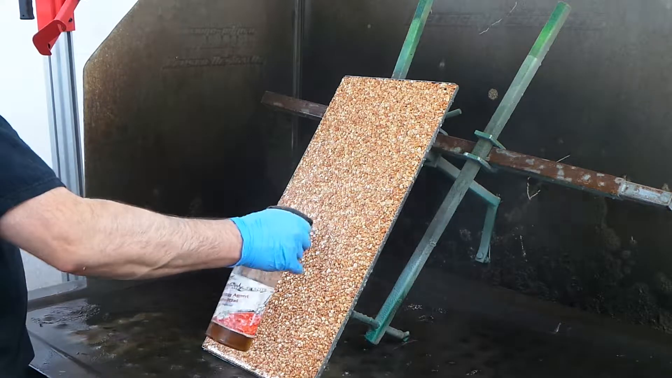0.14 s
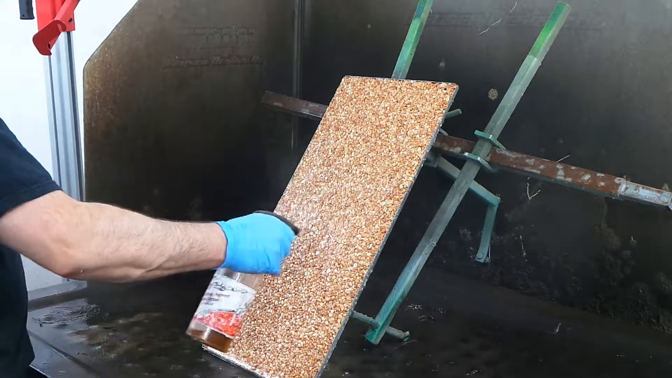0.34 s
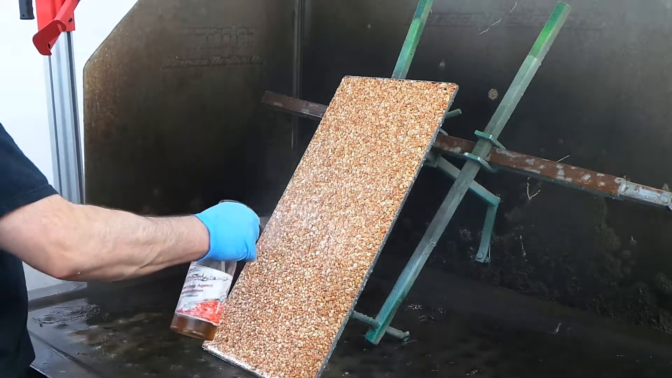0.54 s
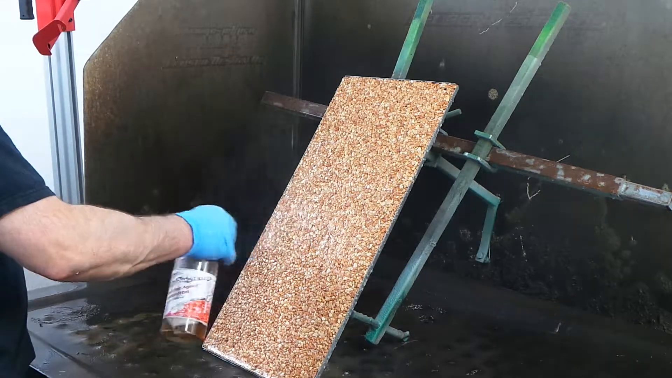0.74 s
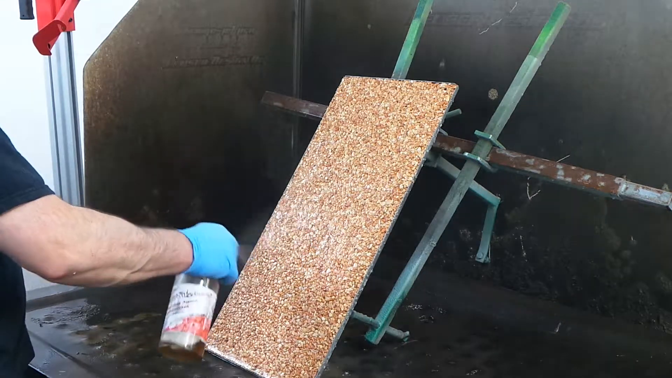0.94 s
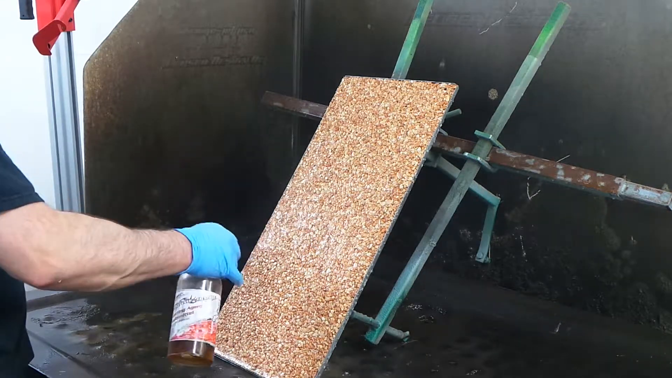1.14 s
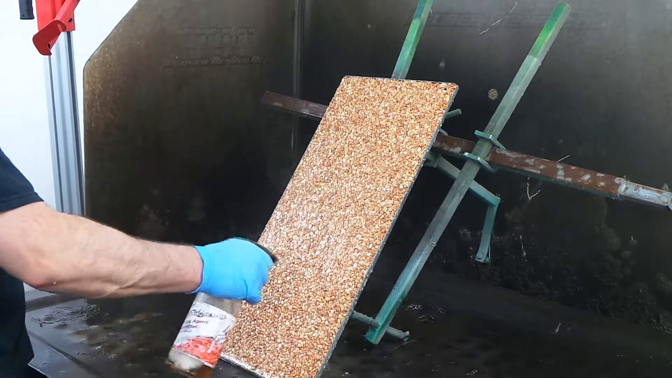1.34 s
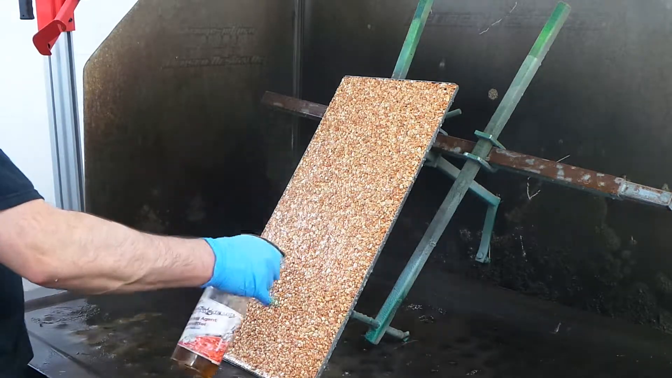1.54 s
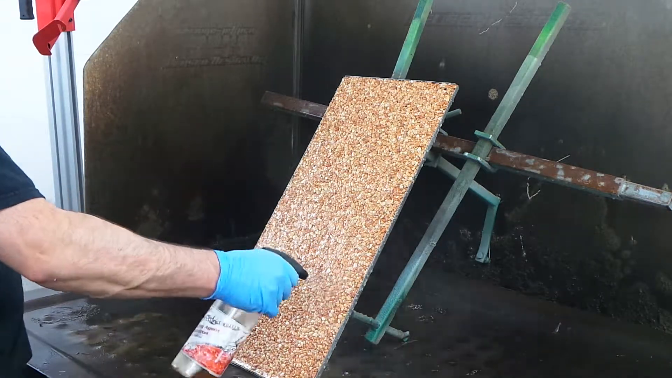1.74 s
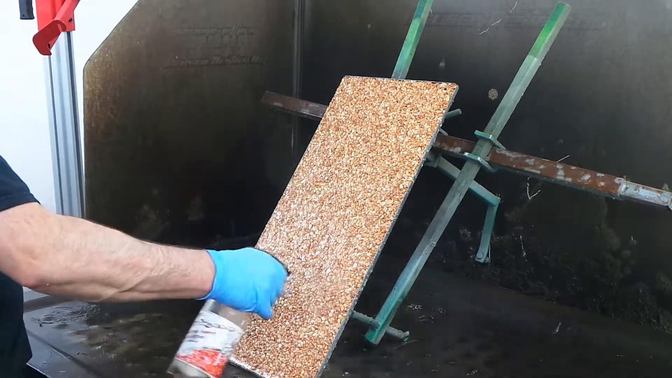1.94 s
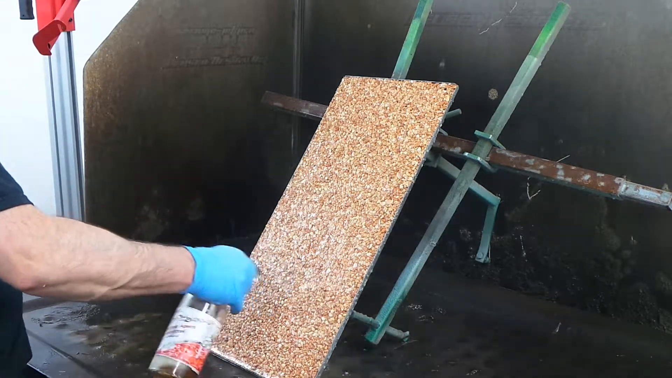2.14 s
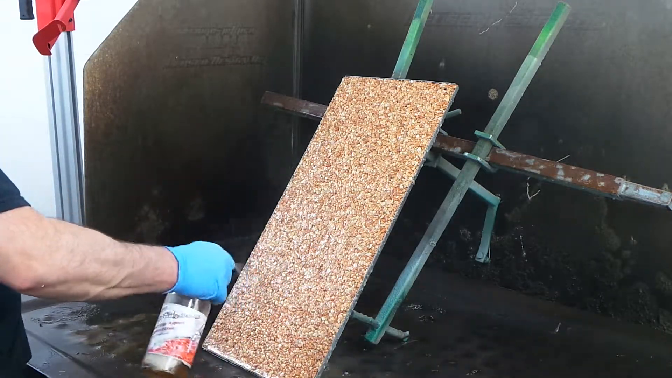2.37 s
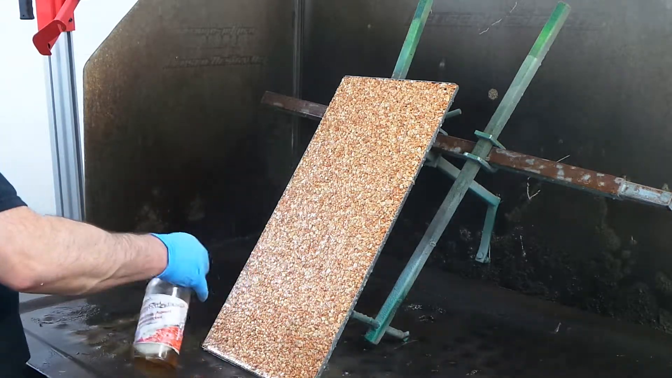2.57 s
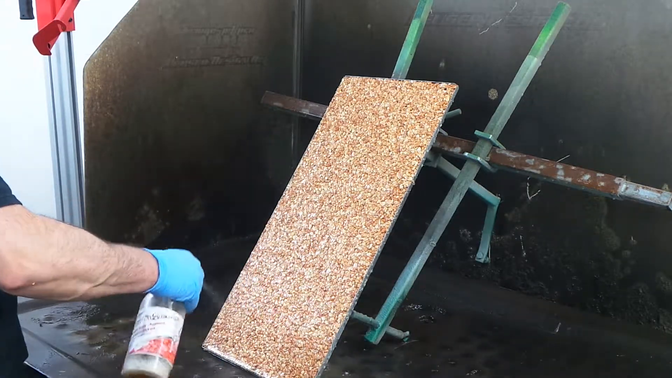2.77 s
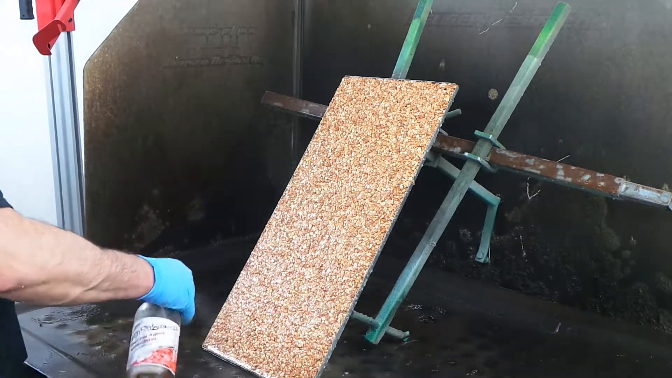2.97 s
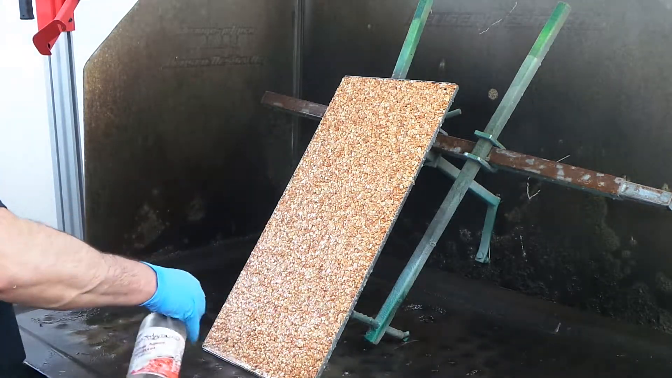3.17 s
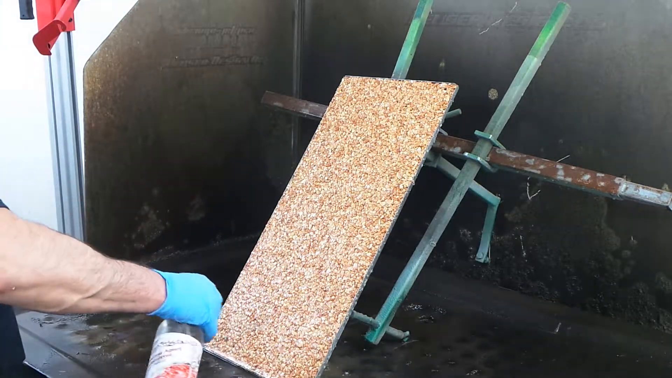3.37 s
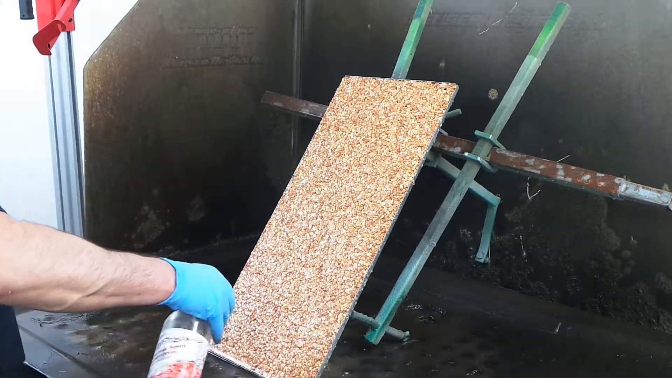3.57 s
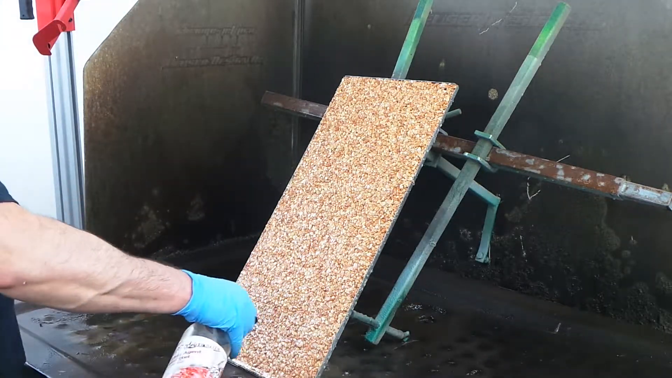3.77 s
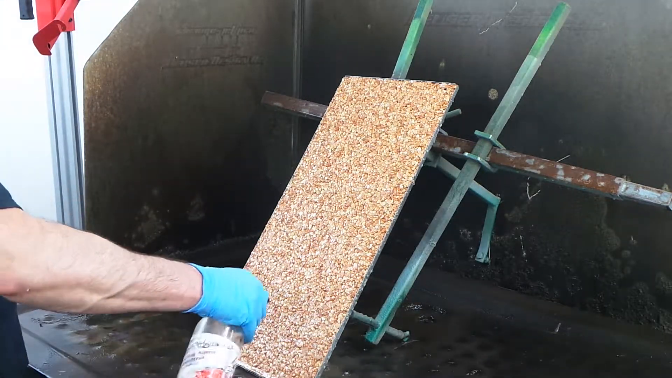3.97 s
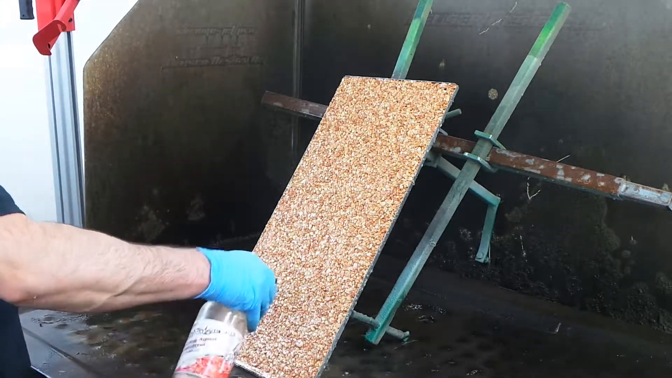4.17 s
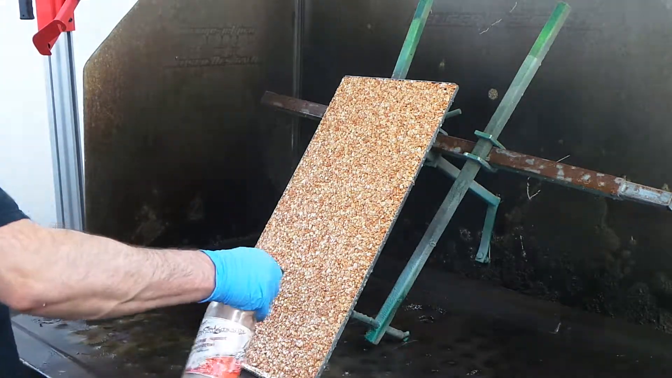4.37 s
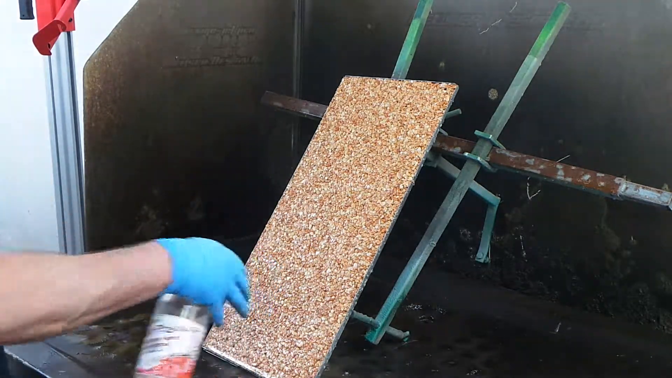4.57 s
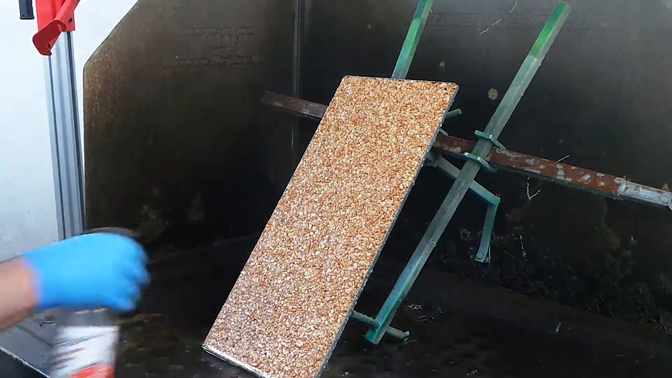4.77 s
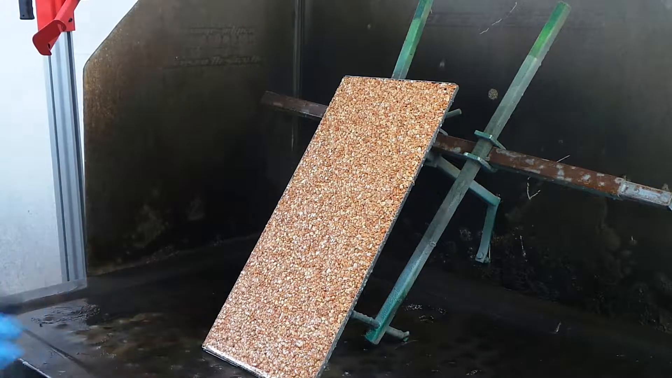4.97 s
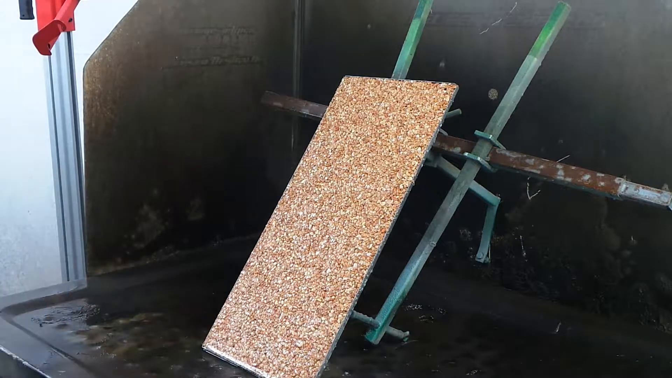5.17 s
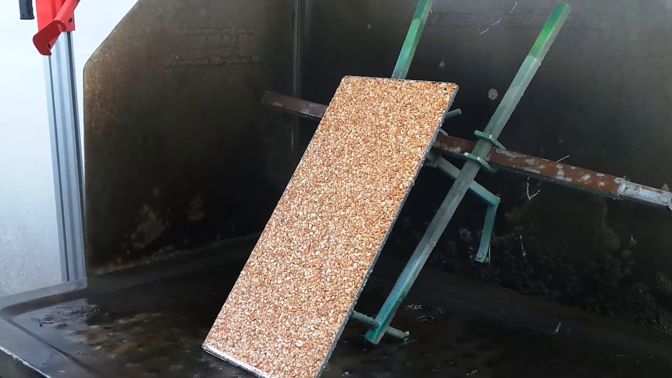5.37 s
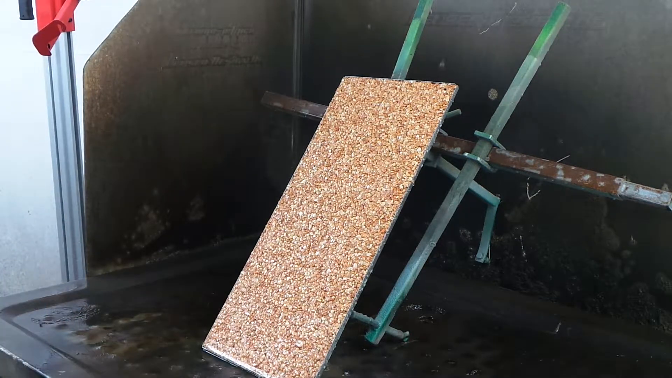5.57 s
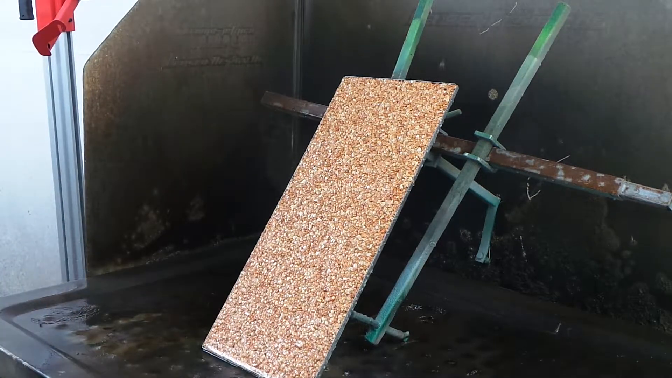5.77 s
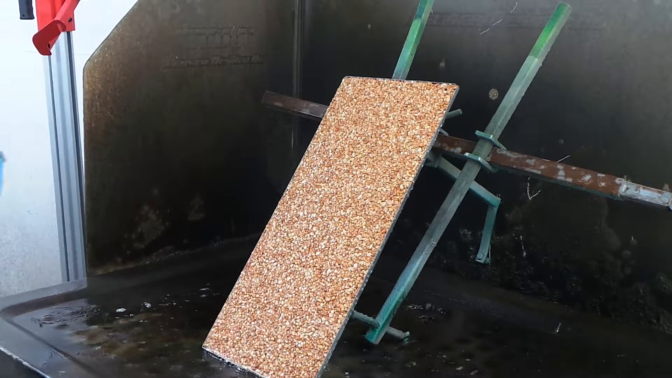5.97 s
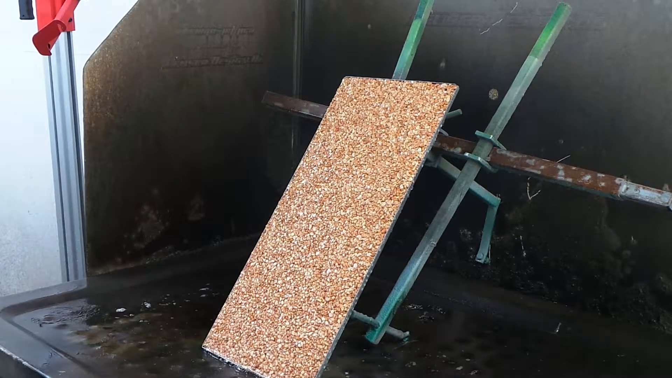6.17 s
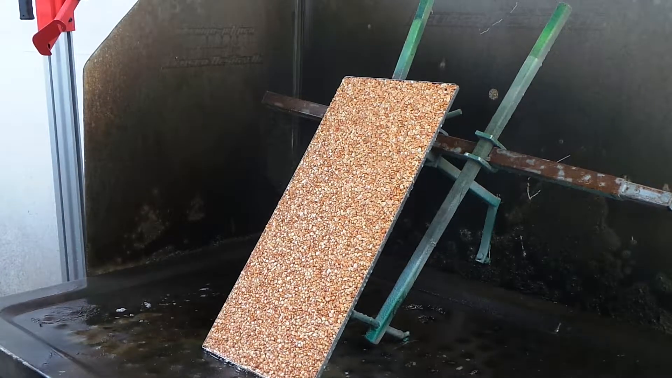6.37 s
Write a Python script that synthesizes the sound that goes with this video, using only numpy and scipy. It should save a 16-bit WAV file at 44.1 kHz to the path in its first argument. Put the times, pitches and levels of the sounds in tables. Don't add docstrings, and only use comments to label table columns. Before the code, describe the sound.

In a metal spray booth, a hand trigger bottle squirts about three times a second, each pull a small plastic snap and short bright hiss pattering on a leaning panel. Midway a soft low thud comes from far off. The squirts stop after a slightly stronger last one, leaving faint air hiss and hum, then a brief final puff. One nearby microphone, slightly coarse, nearly mono sound.

```python
import sys
import numpy as np
from scipy import signal
from scipy.fft import rfft, irfft
from scipy.io import wavfile
from scipy.ndimage import uniform_filter1d

SR = 44100
rng = np.random.default_rng(int(sys.argv[2]) if len(sys.argv) > 2 else 0)


def generate_wav(sig):
    pcm = np.round(np.clip(np.atleast_2d(sig).T, -1, 1) * 32767).astype(np.int16)
    wavfile.write(sys.argv[1], SR, pcm)


def to_linear_factor(level_db):
    exponent = np.asarray(level_db, float) / 20
    return 10 ** exponent


N = 283122

# hz, level_db (per Hz)
PATTER_SPECTRUM = [(900, -11.5), (1500, -2.5), (2300, 0.5), (3500, -2), (5000, -2.5), (7000, -19.5)]


def rms_one(x):
    return x / np.sqrt(np.mean(x ** 2) + 1e-20)


def in_time(rows):
    s, *columns = np.transpose(rows)
    return [np.interp(np.arange(N) / SR, s, c) for c in columns]


def drift(rate_hz):
    r = np.exp(-40 * np.pi * rate_hz / SR)
    white = rng.standard_normal(N // 20 + 4002)
    slow = signal.lfilter([1], [1, -2 * r, r * r], white)[4000:]
    return np.interp(np.arange(N) / 20, np.arange(len(slow)), rms_one(slow))


def coloured(x, spectrum, peaks=()):
    hz = np.arange(N // 2 + 1) * SR / N + 1
    curve_hz, curve_db = np.transpose(spectrum)
    db = np.interp(np.log(hz), np.log(curve_hz), curve_db)
    for peak_hz, width_hz, top_db in peaks:
        db = db + top_db / (1 + (2 * (hz - peak_hz) / width_hz) ** 2)
    return rms_one(irfft(rfft(x) * to_linear_factor(db), N))


def droplets(per_s, spread_db, share, flutter_db):
    sizes = to_linear_factor(spread_db * np.minimum(rng.exponential(1, N), 5)) * rng.choice([-1, 1], N)
    hits = rms_one(sizes * (rng.random(N) < per_s / SR))
    share = np.clip(share, 0, 1)
    mix = np.sqrt(share) * hits + np.sqrt(1 - share) * rng.standard_normal(N)
    return mix * to_linear_factor(flutter_db * drift(38) + flutter_db * drift(3))


def swell(start_s, top_db, rise_s, t60_s):
    t = np.arange(N) / SR - start_s
    return np.clip(t / rise_s, 0, 1) * to_linear_factor(top_db - 60 * np.maximum(t - rise_s, 0) / t60_s)


def booth_echoes(x):
    t60_s = .12
    t = np.arange(SR // 16) / SR
    echoes = to_linear_factor(-33 - 60 * t / t60_s) * rng.standard_normal(len(t))
    echoes[0] = 1
    return rms_one(signal.fftconvolve(x, echoes)[:N])


def workshop():
    # hz, level_db (per Hz)
    air_spectrum = [(18, -56), (30, -25.5), (69, -13), (98, -4), (124, -11), (397, -14.5), (463, -19.5),
                    (776, -12), (1270, -15), (1440, -14), (2970, -14), (3650, -16), (5970, -14.5),
                    (12000, -7.5), (14400, -7.5)]
    # time_s, level_db
    air_level = [(0, -44.5), (.2, -44), (3.5, -45), (4.6, -44), (5.45, -46), (6.42, -44.5)]
    # peak_hz, width_hz, top_db
    booth_modes = [(428, 26, 11), (887, 50, 4.5), (1373, 28, 9.5), (1461, 9.1, 17.5), (1760, 36, 9.5),
                   (1895, 21, 13), (1950, 170, 2.5), (2077, 26, 12.5), (2290, 77, 6), (2720, 46, 4.5),
                   (3780, 120, 7), (7140, 200, 6), (7650, 250, 6), (12800, 250, -0.5)]
    # time_s, level_db
    hum_level = [(0, -63.5), (3, -65), (4.2, -64), (5.2, -69), (6.42, -68)]
    hum_hz = 100.8
    air = coloured(booth_echoes(rng.standard_normal(N)), air_spectrum, booth_modes)
    air_db = in_time(air_level)[0] + 0.57 * drift(6.8)
    hum = np.sqrt(2) * np.sin(2 * np.pi * hum_hz * np.arange(N) / SR + .6 * drift(4))
    hum_db = in_time(hum_level)[0] + 1.9 * drift(5.5)
    return to_linear_factor(air_db) * air + to_linear_factor(hum_db) * hum


def pressure():
    # open_s, build_s, hold_s, crest_db, below_db (under the crest at opening)
    pulls = [(-.15, 0.091, 0.065, -37.5, 6), (0.197, 0.079, 0.093, -39, 2), (.548, 0.11, 0.051, -38.5, 4.5),
             (0.89, 0.11, 0.068, -39, 9.5), (1.235, 0.11, 0.071, -37.5, 11), (1.605, 0.087, 0.083, -38, 8),
             (1.973, .11, 0.075, -37.5, 11), (2.337, 0.1, 0.066, -38.5, 10.5),
             (2.685, 0.072, 0.1, -40, 3.5), (3.014, 0.13, 0.045, -38, 8.5), (3.331, .14, .03, -37, 13.5),
             (3.698, .06, 0.082, -40.5, 2.5), (4.018, .07, 0.096, -38.5, 8),
             (4.328, 0.088, 0.0097, -34.5, 13.5)]
    open_s, hold_sag_db_per_s, release_db_per_s = .012, 15, 134
    take_up_s, dribble_db = 0.049, -8
    linger_db, linger_t60_s = -22.5, .7
    soak_db_per_s = 1.8

    s, build_s, hold_s, crest_db, below_db = np.transpose(pulls)[:, :, None]
    clock = np.arange(0, N, 16)
    t = clock / SR - s
    short_db = below_db * np.clip(1 - t / build_s, 0, 1) ** 1.1 * (t > -take_up_s)
    after_s = np.maximum(t - build_s, 0)
    fall_db = hold_sag_db_per_s * after_s + release_db_per_s * np.maximum(after_s - hold_s, 0)
    dribble = to_linear_factor(dribble_db) * np.clip(1 + t / take_up_s, 0, 1)
    valve = np.maximum(np.clip(t / open_s, 0, 1), dribble)
    power = np.sum((valve * to_linear_factor(crest_db - short_db - fall_db)) ** 2, axis=0) + 1e-12
    keep = to_linear_factor(-120 * clock[1] / (linger_t60_s * SR))
    hanging = signal.lfilter([1 - keep], [1, -keep], power)
    power = power + to_linear_factor(linger_db + soak_db_per_s * clock / SR) * hanging
    level_db = np.interp(np.arange(N), clock, 10 * np.log10(power))
    return level_db, np.interp(np.arange(N), clock, short_db.sum(axis=0))


def spray():
    # hz, level_db (per Hz)
    mist_spectrum = [(2000, -27.5), (3500, -5.5), (4600, -2.5), (6000, 1.5), (9000, 1), (10500, -4),
                     (12000, -21)]
    # hz, level_db (per Hz)
    fine_spectrum = [(8000, -25.5), (9500, -10.5), (11000, 0), (13000, 1.5), (14600, 3), (15500, -24)]
    # hz, level_db (per Hz)
    panel_spectrum = [(120, -26.5), (220, 1), (350, 2.5), (480, 2), (650, 2.5), (850, 6), (1300, 1),
                      (2000, -13.5)]
    # time_s, aim_db
    aim = [(0, 0), (.3, 1.5), (1.3, 0), (1.8, -2.5), (2.5, -4), (3.1, -5), (3.6, -7.5), (4.1, -9.5),
           (4.6, -11)]
    mean_crest_db = -38.5

    mist_db, short_db = pressure()
    aim_db, = in_time(aim)
    swing_db = mist_db - mean_crest_db
    fine_db = -1.3 - 0.56 * short_db - .13 * aim_db + 0.13 * swing_db
    patter_db = -43 + 0.74 * swing_db + .3 * aim_db + .3 * short_db
    panel_db = -50 + .75 * swing_db + 1.1 * aim_db + .6 * short_db

    jet = droplets(6000, spread_db=1.5, share=.35, flutter_db=0.1)
    nozzle = coloured(jet, mist_spectrum) + to_linear_factor(fine_db) * coloured(jet, fine_spectrum)
    patter = coloured(droplets(2500, spread_db=3.5, share=0.31, flutter_db=-1.0), PATTER_SPECTRUM)
    panel = coloured(droplets(700, spread_db=2.5, share=.3, flutter_db=0.0), panel_spectrum)
    return to_linear_factor(mist_db) * nozzle + to_linear_factor(patter_db) * patter + to_linear_factor(panel_db) * panel


def band_noise(low_hz, high_hz):
    sos = signal.butter(2, [low_hz, high_hz], "band", fs=SR, output="sos")
    return rms_one(signal.sosfilt(sos, rng.standard_normal(N)))


def snaps():
    # start_s, peak_db, lower_db (tick re peak)
    snap_events = [(0.182, -26, -8), (0.196, -27, -20), (0.211, -22, -30), (0.219, -25.5, -23),
                   (0.552, -23, -11), (0.5662, -20, -16), (0.844, -28, -8), (0.8963, -17.5, -29),
                   (1.2467, -22, -26), (1.594, -33, -23), (1.608, -19, -34), (1.9464, -24.5, -27),
                   (1.9814, -34, -16), (2.35, -23.5, -16), (2.689, -22, -20), (2.7068, -23, -31),
                   (3.024, -33, -15), (3.706, -19, -25), (5.8908, -26, -26), (5.896, -26, -21),
                   (5.898, -33, -12)]
    rise_s, t60_s = 0.003, .028
    bright, dull = np.zeros(N), np.zeros(N)
    t = np.arange(SR // 10) / SR
    for s, peak_db, lower_db in snap_events:
        i = round(s * SR)
        shape = to_linear_factor(peak_db - 60 * t / t60_s) * np.minimum(t / rise_s, 1)
        bright[i:i + len(t)] += shape
        dull[i:i + len(t)] += shape * to_linear_factor(lower_db)
    spit, tick = band_noise(2200, 12000), band_noise(400, 2000)
    return to_linear_factor(-10) * (bright * spit + dull * tick)


def thud():
    # start_s, peak_db
    blows = [
        (3.312, -41),
        (3.321, -32.5),
    ]
    ring_hz, ring_peak_s, hall_s = 228, .0045, 3.312
    t, out = np.arange(SR // 10) / SR, np.zeros(N)
    ring = t / ring_peak_s * np.exp(1 - t / ring_peak_s) * np.sin(2 * np.pi * ring_hz * t)
    for s, peak_db in blows:
        out[round(s * SR):][:len(t)] += to_linear_factor(peak_db) * ring
    boom = coloured(rng.standard_normal(N), [(50, -33), (75, -3.5), (165, 9.0), (220, -45)],
                    [(81.3, 12, 20), (158, 4.6, 4.9)])
    body = coloured(rng.standard_normal(N), [(130, -32), (175, 4), (320, 1.5), (400, -41)],
                    [(187, 17, 3.2), (260, 15, 1.7)])
    knock = coloured(rng.standard_normal(N), [(270, -38), (340, -0.5), (550, -10.0), (750, -37.5)],
                     [(484, 16, 4.9)])
    out += swell(hall_s, top_db=-44.5, rise_s=.09, t60_s=.62) * boom
    out += swell(hall_s, top_db=-46, rise_s=.04, t60_s=1.1) * body
    out += swell(hall_s, top_db=-50, rise_s=0.014, t60_s=.8) * knock
    return out


def puff():
    # hz, level_db (per Hz)
    puff_spectrum = [(3000, -10.5), (4500, -3), (6500, 2.5), (9000, -3.5), (14000, -15)]
    upper = coloured(droplets(3000, spread_db=2.5, share=0.16, flutter_db=-1.9), puff_spectrum)
    lower = to_linear_factor(-7.5) * coloured(rng.standard_normal(N), PATTER_SPECTRUM)
    return swell(5.887, top_db=-41.5, rise_s=0.013, t60_s=.6) * (upper + lower)


def scene():
    return np.tile(workshop() + spray() + snaps() + thud() + puff(), (2, 1))


def coarse_lines(x, size=1024):
    # hz, step_db
    quiet_step = [(40, -63), (130, -55), (200, -47.5), (400, -49), (700, -47), (1100, -48), (2000, -49),
                  (3500, -47), (6000, -48.5), (9000, -50), (14000, -49)]
    quiet_db, follow, low_follow, low_hz = -47, 1.05, 1.25, 1200
    n, k = np.arange(2 * size), np.arange(size)
    window = np.sin(np.pi * (n + .5) / (2 * size))
    cosines = np.cos(np.pi / size * np.outer(k + .5, n + .5 + size / 2))
    basis = window * cosines * np.sqrt(2 / size)
    blocks = np.pad(x, (size, 2 * size - N % size)).reshape(-1, size)
    lines = np.hstack([blocks[:-1], blocks[1:]]) @ basis.T
    loud_db = 10 * np.log10(np.mean(lines ** 2, axis=1, keepdims=True) + 1e-12)

    step_hz, step_db = np.transpose(quiet_step)
    step_db = np.interp(np.log((k + .5) * SR / 2 / size), np.log(step_hz), step_db)
    band = (np.sqrt(k) * 3 // 2).astype(int)
    chance = rng.standard_normal((2, len(lines), band[-1] + 1))[:, :, band]
    lasting = uniform_filter1d(chance[0], size=3, axis=0) * np.sqrt(3)
    slope = np.where(k < low_hz * 2 * size / SR, low_follow, follow)
    step = to_linear_factor(step_db + slope * (loud_db - quiet_db) + 1.7 * lasting)
    rounded = np.sign(lines) * np.floor(np.abs(lines) / step + .4) * step
    frames = (rounded * to_linear_factor(1.1 * chance[1])) @ basis
    return (frames[:-1, size:] + frames[1:, :size]).ravel()[:N]


def swapped_bands(x):
    # time_s, centre_hz
    swaps = [(.30, 13100), (.515, 5750), (.61, 6240), (.61, 8600), (1.028, 5200), (1.03, 10950),
             (1.72, 8600), (1.72, 11000), (2.25, 12200), (2.44, 9600), (3.14, 4670), (3.14, 10940),
             (3.14, 13500), (3.95, 6340), (4.88, 5700), (4.88, 13200), (5.81, 6300), (6.279, 9000)]
    width_hz = 1240
    side, white, t = np.zeros(N), rng.standard_normal(N), np.arange(-768, 768)
    hz = np.arange(len(t) // 2 + 1) * SR / len(t)
    fade = signal.windows.tukey(len(t), .6)
    for s, centre_hz in swaps:
        at = round(s * SR) + t
        band = np.abs(hz - centre_hz) < width_hz / 2
        strength = np.std(irfft(rfft(x[at]) * band))
        noise = rms_one(irfft(rfft(white[at]) * band))
        side[at] += to_linear_factor(-1.0) * strength * noise * fade
    return side * [[1], [-1]]


def roll_off(x):
    return signal.sosfilt(signal.butter(12, 14500, fs=SR, output="sos"), x)


def record(dry):
    coarse = coarse_lines(dry[0])
    return roll_off(coarse + swapped_bands(coarse))


dry = scene()
out = record(dry)
generate_wav(out)
```